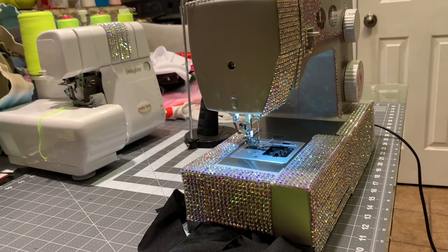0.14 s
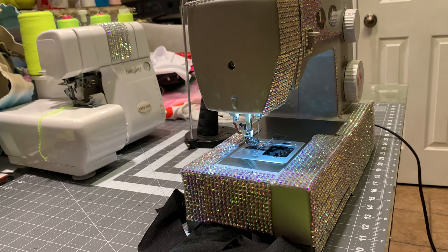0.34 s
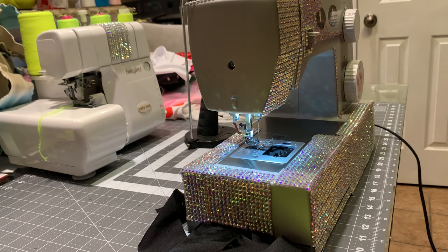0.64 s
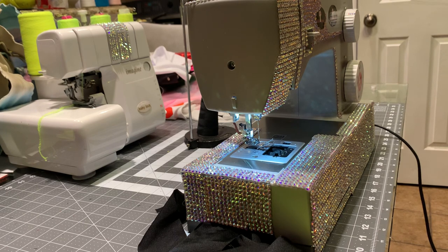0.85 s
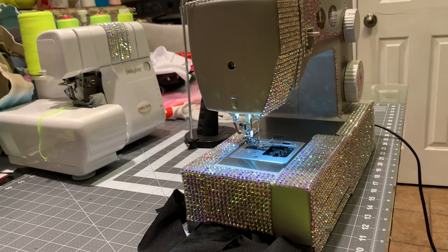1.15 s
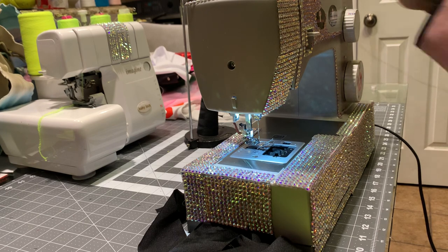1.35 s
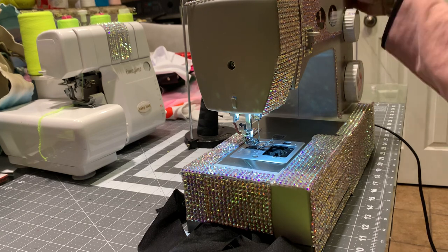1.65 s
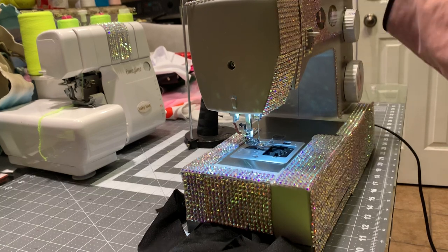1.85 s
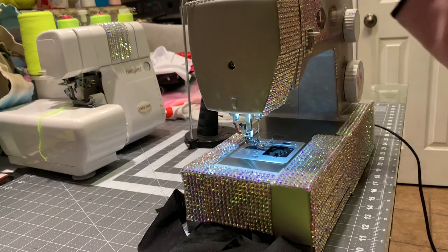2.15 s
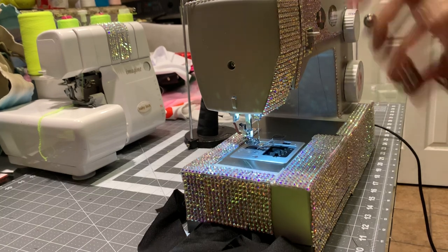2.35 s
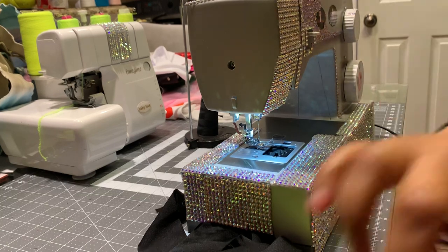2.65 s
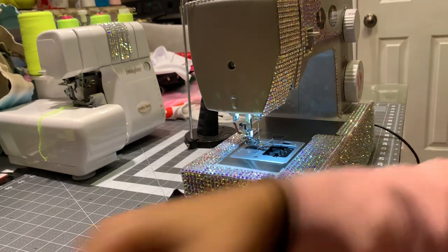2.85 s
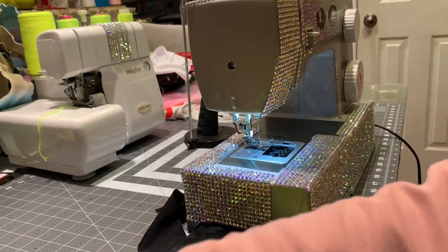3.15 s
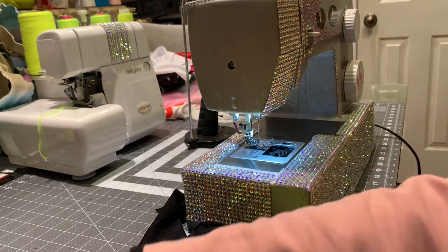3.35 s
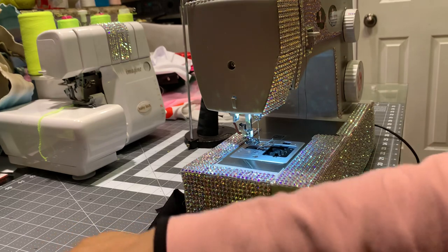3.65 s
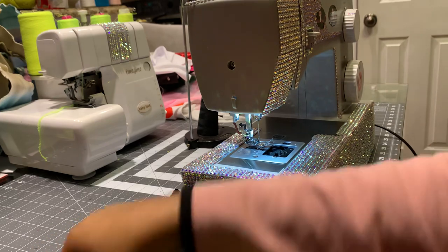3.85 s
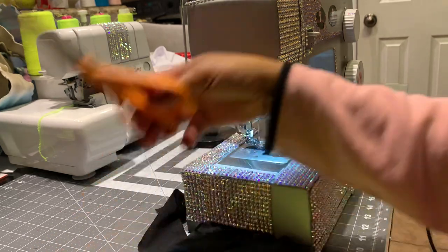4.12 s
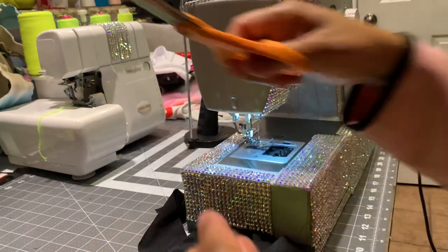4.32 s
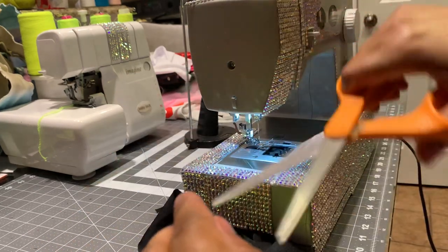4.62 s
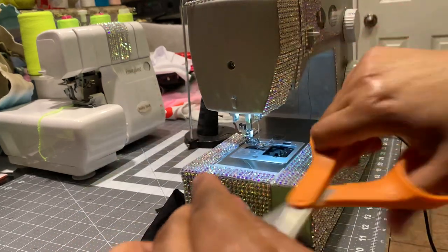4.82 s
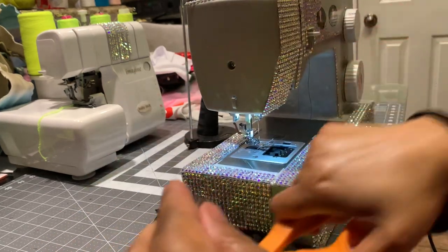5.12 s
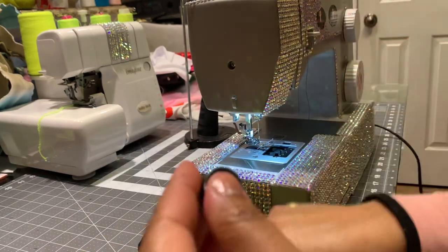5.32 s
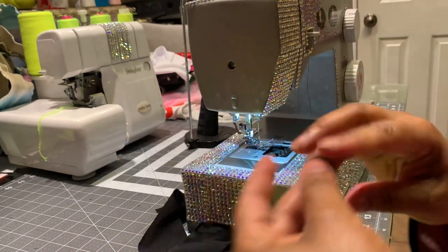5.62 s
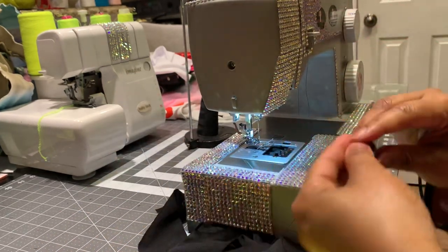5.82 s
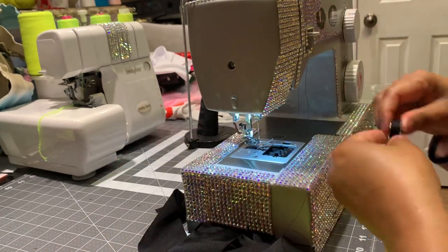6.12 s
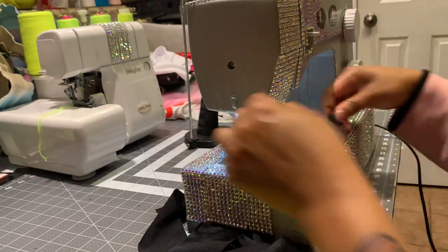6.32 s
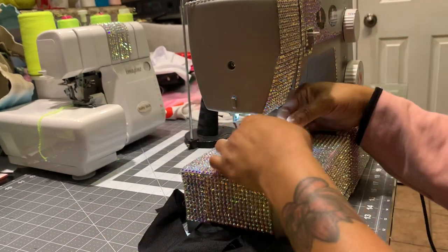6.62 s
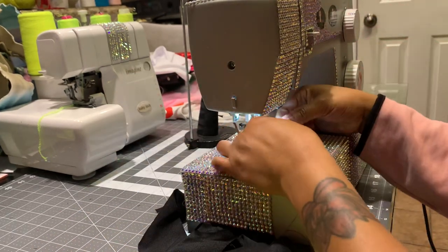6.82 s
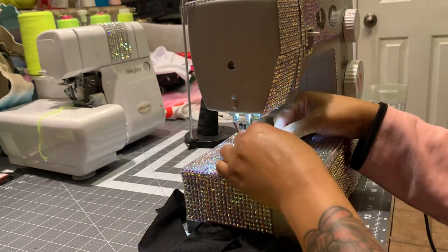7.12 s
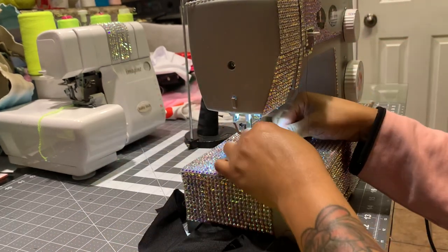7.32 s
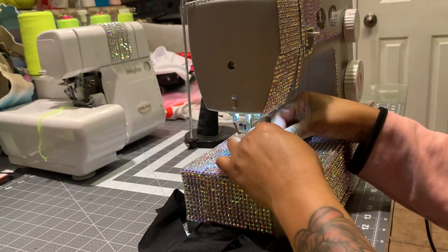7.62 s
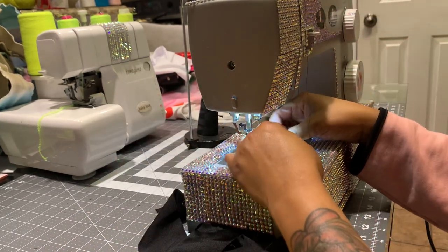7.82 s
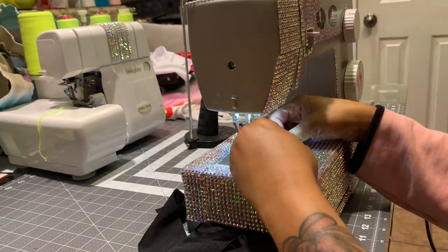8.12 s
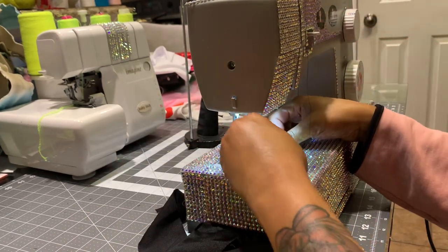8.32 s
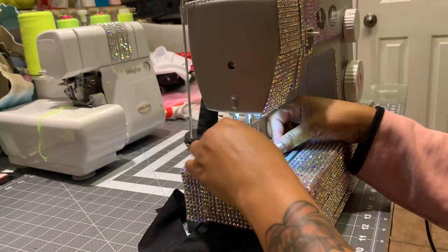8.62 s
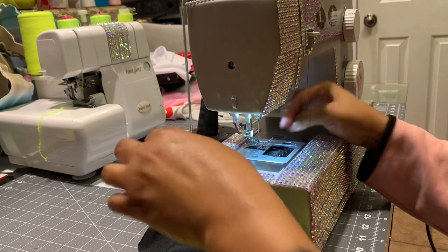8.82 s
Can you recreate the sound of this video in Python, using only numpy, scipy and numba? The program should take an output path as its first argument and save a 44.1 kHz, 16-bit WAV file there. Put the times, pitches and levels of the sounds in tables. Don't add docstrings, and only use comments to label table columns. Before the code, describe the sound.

A high electric whine drops quickly in pitch and dies, followed by one hard mechanical clack. Hands and sleeves rub softly; steel scissors knock irregularly on the desk as they are picked up, bite with a gritty metallic hiss, then land and rattle to rest. Small dull plastic clicks come in clusters and fade to quiet. Close, dry indoor sound with a short room tail and low rumble.

```python
import sys
import numpy as np
from scipy import signal
from scipy.fft import rfft, irfft, next_fast_len
from scipy.io import wavfile
from scipy.ndimage import uniform_filter1d
from numba import njit

SR = 44100
rng = np.random.default_rng(int(sys.argv[2]) if len(sys.argv) > 2 else 0)


def persist_wave(psi):
    counts = np.round(np.clip(psi, -1, 1) * 32767).astype(np.int16)
    wavfile.write(sys.argv[1], SR, np.atleast_2d(counts).T)


def voltage_ratio(decibels):
    exponent = np.asarray(decibels, float) / 20
    return 10 ** exponent


N = 395117
TIME = np.arange(N) / SR

# t/s, commutator rate f/Hz, whine level/dB
COAST = [
    (0.0, 2032, -35.5),
    (0.12, 1784, -36),
    (0.33, 1384, -43),
    (0.62, 878.5, -47),
    (0.812, 584.6, -54),
    (0.945, 396.6, -50.5),
    (1.0, 324.4, -63),
    (1.142, 201.7, -60),
    (1.32, 73.1, -60),
]
# multiple of the rate [1], level/dB
ORDERS = [(1.0, -2), (1.19, -17), (2.0, -5), (2.38, -12), (3.0, -3), (3.57, -12), (3.86, -13), (4.0, -1),
          (4.76, -13), (5.0, -7), (6.0, -11), (7.0, -13), (7.14, -14), (8.0, -15), (8.3, -16)]
# f/Hz, width [Hz], level/dB
HOUSING = [(268.3, 55, 13), (404, 36, 23.5), (630, 52, 19.5), (833, 69, 22.5), (1032, 50, 12),
           (1852, 76, 14), (2726, 67, 8), (3190, 180, 6), (3700, 140, -1), (4200, 400, 3.5),
           (4970, 180, -4.5), (5710, 900, -1), (6540, 220, -12), (9130, 2900, 0.5)]
# f/Hz, width [Hz], level/dB
BELT_COVER = [(1360, 170, 5), (2750, 300, 0)]
# f/Hz, density level/dB [per Hz]
RATTLE = [(59, -23), (100, -7.5), (1230, -8.5), (1330, -9), (1610, -12.5), (1830, -12.5), (2170, -8.5),
          (10700, -21), (11900, -39.5), (13500, -17), (16000, -74)]
# f/Hz, density level/dB [per Hz]
RUMBLE = [(25, -32.5), (45, -17), (60, -2.5), (68, 2), (80, -6), (110, -9), (160, -33.5)]


def motor():
    stop_s = COAST[-1][0]
    n = int(stop_s * SR)
    hz, whine_db = curves(COAST, n)
    speed = hz / hz[0]
    bearings_free_hz = 170
    rattle_db = -30 + 20.5 * np.log10(speed) - 20 * np.log10(1 + (bearings_free_hz / hz) ** 4)
    desk_hz, shake_db_per_octave = 656, 12.5
    shake_db = -45.5 - shake_db_per_octave * np.abs(np.log2(hz / desk_hz))

    phase = 2 * np.pi * np.cumsum(hz * (1 + 0.002 * walk(60, n))) / SR
    swell = 1 + 0.7 * np.sin(phase / 10)
    upper = 1 / (1 + (490 / hz) ** 4)
    orders = np.zeros(n)
    for k, db in ORDERS:
        edge = upper * swell if k > 2.2 else swell ** 0.3
        unsteady_db = min(1.5 + 3.5 * (k - 1), 4.0) * walk(60, n)
        jitter = (0.25 + 0.12 * k) * walk(150, n)
        orders += edge * voltage_ratio(db + unsteady_db) * np.sin(k * phase + jitter)
    belt = speed ** 2 * (np.sin(4 * phase / 5) + 0.3 * np.sin(8 * phase / 5))
    whine = resonate(orders, HOUSING) + voltage_ratio(-4) * orders + resonate(belt, BELT_COVER)
    whine = voltage_ratio(whine_db) * np.clip(hz / 240, 0, 1) ** 3 * whine

    shaft = phase / 8
    grit = noise(RATTLE, n) * (1 + 0.11 * np.sin(shaft))
    rattle = unit(grit + voltage_ratio(-5.0) * resonate(grit, HOUSING)) + 1.26 * spread(RATTLE, 0.2, n)
    dull = signal.lfilter(*signal.butter(1, 1500, fs=SR), rattle)
    rattle = voltage_ratio(rattle_db - 7.5) * (dull + (rattle - dull) * speed ** 0.11)

    shake = resonate(np.sin(shaft), [(87.5, 56, 9.4)])
    shake = shake + resonate(noise(RUMBLE, n), [(87.2, 11, 6.8)]) + 0.5 * noise(RUMBLE, n)
    running = np.clip((stop_s - TIME[:n]) / 0.06, 0, 1)
    return place(running * (whine + voltage_ratio(shake_db) * shake + rattle), lag=1, scatter_db=-28.0)


# t/s, crack level/dB, body level/dB, shell level/dB
LATCH = [
    (1.0859, -42, -42.5, -60.5),
    (1.4503, -66, -59.5, -61),
    (1.4925, -60, -52.5, -56),
    (1.6469, -5.5, -15.5, -5.5),
    (1.986, -57, -38, -40),
    (1.996, -62, -45, -38),
]
# t/s, crack level/dB, body level/dB, shell level/dB
TICKS = [
    (1.9037, -75, -55, -65),
    (1.933, -47, -64, -70),
    (1.946, -43.5, -72, -65),
    (1.978, -34.5, -70, -70),
    (1.995, -44, -70, -68),
    (2.006, -50.5, -64.5, -76),
    (2.491, -52, -78.5, -74),
    (2.593, -55.5, -77, -78),
]
# f/Hz, level/dB, t60 [s]
MACHINE = [(244, -6.5, .1), (430, -3, 0.087), (686, -12, 0.11), (743, 5, 0.16), (817, 1.5, 0.14),
           (990, -2, 0.032)]


def latch():
    snap = blows(LATCH, MACHINE, lag=13, pan=-2.4, length=0.65, rise_s=0.0064, crack_s=0.0054,
                 crack_db=1.5, body_db=5.0, shell_db=4.0, rough=0.12, shell_t60=0.12)
    ticks = blows(TICKS, MACHINE, lag=4, pan=-0.72, length=0.98, rise_s=0.00063, crack_s=0.002,
                  crack_db=9.0, body_db=-7.0, shell_db=11.5, rough=0.53, shell_t60=0.25)
    return snap + ticks


# t/s, crack level/dB, body level/dB, shell level/dB
LIFT = [(2.9877, -44, -46.5, -65), (2.9977, -41.5, -43.5, -76), (3.056, -32.5, -35.5, -41),
        (3.0688, -64.5, -34.5, -56), (3.1211, -15, -26, -21.5), (3.1488, -18, -22, -27),
        (3.218, -15.5, -35, -49), (3.2254, -18.5, -46, -43), (3.2394, -32.5, -31.5, -36),
        (3.3626, -65, -48, -53.5), (3.3837, -25, -44, -37), (3.4077, -20, -33, -57.5),
        (3.4194, -20, -49, -55), (3.472, -7, -21.5, -19.5), (3.678, -27.5, -28.5, -27.5),
        (3.7893, -23.5, -42, -42), (3.8349, -56, -68.5, -74), (3.855, -60, -68.5, -73.5),
        (3.873, -51, -76, -63), (3.9197, -62, -70.5, -68.5), (3.9634, -53, -78.5, -80.5),
        (3.9925, -45.5, -81.5, -84), (4.0135, -51, -89, -88), (4.184, -55, -45, -53),
        (4.1997, -52, -38.5, -61.5), (4.7007, -56, -81, -73), (4.8507, -47.5, -57, -66.5)]
# f/Hz, level/dB, t60 [s]
DESK = [(170.1, -4, 0.31), (277.6, -5, 0.53), (411.7, -0.5, 0.011), (480.2, 2, 0.13), (653, -3, 0.1),
        (775, 4, 0.14), (1072, 0, 0.013), (1232.6, -2, 0.036)]


def lifted_scissors():
    return blows(LIFT, DESK, lag=-13, pan=1.5, length=1.07, rise_s=0.00055, crack_s=0.00063,
                 crack_db=5.5, body_db=7.5, shell_db=6.5, rough=0.93, shell_t60=0.098)


# t/s, crack level/dB, body level/dB, shell level/dB
DROP = [
    (5.3547, -6, -28, -31.5),
]


def bounces(count):
    flight_s, rock_s, spring = 0.0534, 0.007, 0.67
    bounce_db, db_per_decade = (-12.5, -38, -40.5), (28, 21.5, 28.5)
    flight = rock_s + (flight_s - rock_s) * spring ** np.arange(count)
    db = np.array(bounce_db) + np.outer(np.log10(flight / flight_s), db_per_decade)
    return np.column_stack([DROP[0][0] + np.cumsum(flight), db]).tolist()


# f/Hz, level/dB, t60 [s]
THUMP = [(139, 4, 0.25), (201, 2.5, 0.14), (340, -4, 0.136)]


def dropped_scissors():
    return blows([*DROP, *bounces(count=11)], [*DESK, *THUMP], lag=9, pan=-0.7, length=0.8,
                 rise_s=0.002, crack_s=0.0012, crack_db=2.0, body_db=9.5, shell_db=16.5,
                 rough=0.67, shell_t60=0.055)


# t/s, crack level/dB, body level/dB, shell level/dB
SEAT = [(6.832, -52.5, -55.5, -51.5), (7.2744, -56, -59, -52), (7.3029, -50, -59, -46.5),
        (7.3311, -33.5, -50, -34.5), (7.3731, -39.5, -55, -47), (7.5389, -68.5, -69, -58),
        (7.5731, -35, -57, -38.5), (7.6038, -21.5, -44, -29.5), (7.6686, -34.5, -48, -41),
        (7.6946, -23, -45, -32), (7.8178, -62, -60.5, -49), (7.8434, -26, -48, -37),
        (7.8971, -50, -52.5, -48.5), (8.6495, -68.5, -57.5, -52), (8.9188, -54, -74.5, -84.5)]
# t/s, crack level/dB, body level/dB, shell level/dB
KNOCK = [
    (6.8064, -36.5, -58.5, -42.5),
    (7.116, -47, -53, -46.5),
    (7.9927, -59.5, -46, -52),
    (8.6074, -62, -52.5, -70),
    (8.7504, -67, -65, -61),
    (8.8049, -47, -62, -52.5),
]
# f/Hz, level/dB, t60 [s]
CASE = [(321.4, 0.5, 0.18), (415.4, 10, 0.091), (517, 9, 0.042), (596, 11, 0.075), (711, 5, 0.084),
        (779, 8.5, 0.056), (780, -18.5, 0.031)]


def bobbin_case():
    seat = blows(SEAT, CASE, lag=-1, pan=-3.6, length=1.64, rise_s=0.0088, crack_s=0.0042,
                 crack_db=-4.0, body_db=13.5, shell_db=2, rough=1.0, shell_t60=0.069)
    knock = blows(KNOCK, CASE, lag=-1, pan=-0.32, length=1.0, rise_s=0.0013, crack_s=0.002,
                  crack_db=-6.5, body_db=15.5, shell_db=2.0, rough=0.99, shell_t60=0.12)
    return seat + knock


# f/Hz, density level/dB [per Hz]
CRACK = [(1760, -35.5), (3000, -4.5), (4380, 0), (6470, -4), (7600, -3), (10200, 2), (11700, -3),
         (13600, -1), (16200, -23), (17000, -20.5)]


def blows(events, modes, lag, pan, length, rise_s, crack_s, crack_db, body_db, shell_db, rough, shell_t60):
    lead = 1024
    out, t = np.zeros((2, N + 8192)), np.arange(6144) / SR
    size = len(t)
    hz, db, t60 = np.transpose(modes)
    for s, crack, body, shell in events:
        chance, crowd = rng.standard_normal((2, len(modes))), rng.random((2, 64))
        low = ring(hz * (1 + 0.032 * chance[0]), db + 2.8 * chance[1], t60 * length, size)
        minor_hz, minor_db = 240 * 5.0 ** crowd[0, :16], -9 - 7 * crowd[1, :16]
        low = low + ring(minor_hz, minor_db, np.full(16, 0.07 * length), size)
        low = signal.lfilter(*signal.butter(2, 130, "high", fs=SR), low)
        shell_hz = 1200 * 3.7 ** crowd[0]
        high = ring(shell_hz, -7 * crowd[1], shell_t60 * length * (1500 / shell_hz) ** 0.8, size)
        buzz = signal.lfilter(*signal.butter(1, 160, fs=SR), rng.standard_normal((2, size)))
        buzz = buzz / buzz.std() * np.minimum(t / 0.0016, 1)
        low = low * (1 + rough * 0.4 * buzz[0])
        high = high * (1 + rough * buzz[1])
        tick = noise(CRACK, size) * (np.exp(-t / crack_s) + 0.05 * np.exp(-t / (0.025 * length)))
        layers = zip((tick, low, high), (crack + crack_db, body + body_db, shell + shell_db))
        tick, low, high = (np.pad(voltage_ratio(level) * x / np.abs(x).max(), (lead, 0)) for x, level in layers)
        backwards = (low + high + tick)[2 * lead - 1:lead - 1:-1]
        high[:lead] = 0.85 * backwards * np.exp(-t[lead:0:-1] / rise_s)
        bright = tick + high
        hit = low + np.array([np.roll(bright, max(lag, 0)), np.roll(bright, max(-lag, 0))])
        i = int(s * SR) - lead
        out[:, i:i + lead + size] += hit * voltage_ratio(np.array([[pan], [-pan]]) / 2)
    return place(out[:, :N], lag=0, scatter_db=-18.5)


# t/s, peak level/dB, f/Hz, left minus
# right [dB]
LONG_RINGS = [(1.647, -6.5, 757.5, 12), (1.986, -27.5, 970, 1), (3.057, -28.5, 1270, 6),
              (3.123, -34, 850, 12), (3.149, -19.5, 1033, 10), (3.218, -25, 1000, 8), (3.383, -23, 482, 1.5),
              (3.473, -24, 498, 7), (3.681, -26, 788, 8), (3.791, -35.5, 508, 3.0), (4.187, -32, 609, 2.5),
              (5.355, -20.5, 800, 14), (5.407, -30, 804, 13), (5.446, -28.5, 786, 12.5),
              (6.806, -48, 700, -4), (7.115, -39.5, 763, -0.5), (7.212, -41.5, 813, 1.5),
              (7.302, -39, 638, -8.5), (7.33, -35, 415, -6), (7.572, -42.5, 384, 4), (7.604, -34.5, 771, -5),
              (7.694, -21.5, 387, -1), (7.843, -28, 757, -4), (7.896, -36, 395, -1),
              (7.992, -30.5, 383.5, 3), (8.608, -44, 593, -1),
              (1.652, -12.5, 404, -3), (1.995, -24.5, 302, 0), (3.121, -25.5, 5500, -8),
                (3.155, -24, 730, 8), (3.24, -26, 1139, 5.5), (3.39, -24.5, 1074, 9),
                (3.475, -17.5, 1010, 9), (5.36, -28, 445, 8), (7.604, -42, 406, 0), (7.70, -47, 635, 0),
                (7.994, -47, 1123, -4), (8.608, -43.5, 1013, -0.5), (8.61, -41, 300, 0),
                (8.65, -50.5, 433, -4)]
# t/s, peak level/dB, f/Hz, left minus right [dB]
HIGH_RINGS = [(1.6472, -3, 2032, -8), (3.056, -42, 2180, 11), (3.1216, -14, 4220, 8),
              (3.1484, -16, 3720, -5), (3.22, -29, 4000, 0.0), (3.4087, -30, 4570, -3),
              (3.471, -26, 3540, 9), (3.6782, -23.5, 3650, 11), (4.7012, -49, 3000, -6),
              (5.0574, -23, 6260, -5.5), (5.3543, -27, 4460, 1), (5.4081, -28, 4550, -5),
              (5.4452, -26, 6130, -8), (6.8069, -34, 3475, -3), (7.1137, -46.5, 3880, 0),
              (7.3327, -32, 2400, -2.5), (7.3721, -34, 3530, -5), (7.5732, -30, 3700, 1.5),
              (7.6047, -29, 3850, -1.0), (7.6944, -22, 3790, -6), (7.71, -28.5, 2500, 1),
              (7.847, -28, 3680, 4), (7.847, -36.5, 1730, 0), (7.9932, -40.5, 2180, -1)]
# t/s, peak level/dB, f/Hz, left minus right [dB]
FAINT_RINGS = [(1.585, -49, 1400, 3), (1.596, -51, 2483, -4), (2.553, -53.5, 3320, 0.5),
               (2.632, -59, 3400, -1.5), (2.775, -61.5, 3800, -3), (3.835, -45, 4120, 0),
               (3.857, -45, 4120, -0.5), (3.872, -51, 4200, -0.5), (3.918, -57, 4140, 0),
               (4.013, -57.5, 3700, -2.5), (3.967, -46, 8300, 0), (3.976, -53.5, 9050, 0),
               (3.993, -41, 8400, 0), (4.013, -40, 8200, 0), (5.793, -59, 7300, 0), (5.965, -52, 1350, 0),
               (6.333, -63.5, 1604, -0.5), (6.643, -63, 1000, 3.5), (8.72, -62.5, 2000, 1),
               (8.752, -58, 2400, 0), (8.808, -57, 2440, -1)]


def struck_parts():
    low = rings(LONG_RINGS, ring_db=-4, t60=0.075)
    return low + rings([*HIGH_RINGS, *FAINT_RINGS], ring_db=0, t60=0.016)


def rings(events, ring_db, t60):
    n = 8192
    out = np.zeros((2, N + n))
    for s, db, hz, pan_db in events:
        short = t60 * min(1, 1500 / hz + 0.4)
        partners_hz, partners_db = hz * np.array([1, 1.045, 0.93]), np.array([0.0, -6.0, -9.0])
        x = ring(partners_hz, partners_db, short * np.array([1, 0.7, 0.6]), n)
        x = x * voltage_ratio(3.5 * walk(hz / 8, n)) * np.minimum(TIME[:n] * hz / 5.1, 1)
        sides_db = np.clip(pan_db, -8, 8) * np.array([[0.5], [-0.5]])
        i = int(s * SR)
        out[:, i:i + n] += x * voltage_ratio(db + ring_db + sides_db)
    return out[:, :N]


# start t/s, attack [s], hold [s], release [s], level/dB
SNIPS = [
    (4.424, .014, 0.026, 0.061, -37.5),
    (4.825, 0.046, .02, 0.015, -40),
    (4.872, 0.019, 0.014, 0.0057, -27),
    (5.043, 0.011, 0.0036, 0.039, -35.5),
    (5.05, .016, 0.026, 0.01, -36),
    (5.19, .03, 0.0062, 0.044, -64.5),
]
# f/Hz, density level/dB [per Hz]
BLADES = [(300, -16.5), (1000, -23), (1900, -17), (3300, -17.5), (10600, -12), (11700, -3), (13500, -12),
          (15900, -32), (17000, -72.5)]
BLADE_BANDS_HZ = [2000, 3200, 4300, 5600, 7000, 8600, 10300, 13000, 15000]


def scissors():
    first, n = int(SNIPS[0][0] * SR), SR
    gritty = noise(BLADES, n) * voltage_ratio(2.2 * walk(700, n))
    grit = np.zeros(N)
    grit[first:first + n] = patchy(gritty, BLADE_BANDS_HZ, rate=110, patchy_db=4.5)
    return place(grit * stroke(SNIPS), lag=1, scatter_db=-23)


# start t/s, attack [s], hold [s], release [s], level/dB
SHEEN = [
    (3.27, 0.063, 0.067, .03, -50.5),
    (3.49, .01, 0.048, 0.46, -53),
    (3.69, 0.015, 0.058, 0.028, -68),
    (3.8, 0.013, 0.038, 0.23, -68),
]
# f/Hz, density level/dB [per Hz]
STEEL = [(3000, -29), (6000, -8), (8500, -1.5), (10800, -6.5), (11700, -27.5), (13500, -10), (14500, -39.5)]


def sheen():
    return stroke(SHEEN) * patchy(spread(STEEL, 0.42), BLADE_BANDS_HZ, rate=30, patchy_db=-3.5)


# start t/s, attack [s], hold [s], release [s], level/dB
SLIDES = [(1.622, .023, .001, .006, -25), (1.66, .005, .03, .55, -40), (1.975, .013, .014, .065, -41),
          (3.14, .011, .098, .11, -39.5), (3.31, .092, .0021, .01, -36), (3.48, .01, .03, .34, -44),
          (4.17, .025, .03, .2, -50), (4.83, .04, .05, .15, -59), (5.04, .04, .03, .12, -59),
          (6.0, .36, .25, .3, -68), (7.29, .016, .085, .083, -56.5), (7.8, .032, .091, .081, -65),
          (7.995, .0052, .45, .4, -65), (8.602, .0063, .028, .12, -63)]
# f/Hz, density level/dB [per Hz]
SCRAPE = [(180, -42.5), (300, -13.5), (962, -0.5), (2890, -14), (3300, -16), (7690, -19.5), (9570, -24),
          (13400, -35.5), (17000, -59)]
# start t/s, length [s], f/Hz, glide [Hz per
# s], level/dB
SQUEAKS = [(1.955, 0.032, 3700, 127000, -39), (3.335, 0.0602, 1850, 8.3, -44),
           (3.33, 0.052, 2416, 10, -54.5), (3.499, 0.08, 1850, 8.2, -42), (3.352, 0.063, 184, 9.2, -35.5),
           (4.19, 0.12, 140.8, 12.5, -54), (5.57, 0.1, 170, 0.97, -56), (5.74, 0.21, 2500, 12.5, -77.5),
           (2.2, 0.13, 2450, 10, -71.5), (2.21, 0.072, 4200, 9.7, -77), (6.22, 0.4, 3650, 11.3, -81),
           (7.948, 0.36, 3700, 9.6, -78), (8.61, 0.15, 170, 1, -52.5)]
CLOTH_BANDS_HZ = [800, 1400, 2500, 3700, 6000, 10000]


def slides():
    out = stroke(SLIDES) * patchy(noise(SCRAPE), [450, *CLOTH_BANDS_HZ], rate=28, patchy_db=5.5)
    wobble, flutter = walk(400), walk(220)
    for s, length, hz, glide, db in SQUEAKS:
        now = slice(int(s * SR), int((s + length) * SR))
        t = TIME[now] - s
        phase = 2 * np.pi * np.cumsum((hz + glide * t) * (1 + 0.055 * wobble[now])) / SR
        swell = np.abs(np.sin(np.pi * t / length)) ** 0.56
        out[now] += np.sin(phase) * voltage_ratio(db + 4.2 * flutter[now]) * swell
    return place(out, lag=2, scatter_db=-19.0)


# t/s, drag level/dB, arm weight level/dB
HANDS = [(1.2, -70, -53), (1.62, -63.5, -81.5), (1.72, -50.5, -57.5), (2.32, -62.5, -66.5),
         (2.71, -73, -65.5), (3.03, -61.5, -49.5), (3.19, -50, -52), (3.6, -45, -57.5), (3.95, -75, -60.5),
         (4.25, -70.5, -62.5), (5.3, -70.5, -65.5), (5.42, -71, -48.5), (6.13, -76, -70.5),
         (6.52, -61, -66.5), (7.12, -78, -56), (7.62, -62, -55.5), (8.79, -65.5, -59.5), (8.96, -65, -68)]
# f/Hz, density level/dB [per Hz]
RUB = [(59, -35), (100, 2), (184, 0), (226, -3), (332, -3), (795, -14.5), (1160, -28), (1500, -21),
       (1950, -52), (3300, -120)]
# f/Hz, density level/dB [per Hz]
RUSTLE = [(470, -28), (800, 4.5), (1390, -14.5), (1720, -2), (3350, -14.5), (4440, -22.5), (10600, -19),
          (11900, -37.5), (13700, -27.5), (17000, -79)]


def hands(struck):
    drag_db, weight_db = curves(HANDS)
    settle_s, settle_db = 0.0086, (-22, -16, -26.5)
    keep = np.exp(-1 / (settle_s * SR))
    stir = np.sqrt(signal.lfilter([1 - keep], [1, -keep], struck.mean(0) ** 2))
    after = voltage_ratio(np.array(settle_db))[:, None] * stir
    present = np.clip((TIME - HANDS[0][0]) / 0.051, 0, 1)
    rub = (voltage_ratio(drag_db) + after[0]) * voltage_ratio(2.5 * walk(25)) * spread(RUB, 0.6)
    cloth = patchy(spread(RUSTLE, 0.099), CLOTH_BANDS_HZ, rate=12, patchy_db=2.5)
    flutter_db = 1.5 * walk(20) + 0.7 * walk(300)
    rustle = (voltage_ratio(-74.5 + 1.2 * (drag_db + 64.5)) + after[1]) * voltage_ratio(flutter_db) * cloth
    rumble = (voltage_ratio(weight_db) + after[2]) * voltage_ratio(walk(5.4)) * spread(RUMBLE, 0.96)
    return present * (rub + rustle) + rumble


def room(x):
    t60_s, treble_t60_s, treble_db = 0.36, 0.3, -11.5
    t = TIME[:SR // 2]
    tail = rng.standard_normal((2, len(t))) * np.clip((t - 0.004) / 0.0046, 0, 1)
    bass = signal.lfilter(*signal.butter(1, 2500, fs=SR), tail)
    tail = bass * voltage_ratio(-60 * t / t60_s) + (tail - bass) * voltage_ratio(treble_db - 60 * t / treble_t60_s)
    tail = signal.lfilter(*signal.butter(4, 14200, fs=SR), tail)
    tail = tail / np.sqrt(np.sum(tail ** 2) / 2)
    return voltage_ratio(-14.5) * signal.fftconvolve(x.mean(0)[None], tail, axes=1)[:, :N]


# f/Hz, density level/dB [per Hz]
AIR = [(12, -45.5), (20, -2.5), (78, -6.5), (247, -17), (356, -24.5), (681, -15.5), (983, -28),
       (10200, -36.5), (11800, -47.5), (13600, -27), (17000, -68)]


def still_air():
    return voltage_ratio(-70.5) * spread(AIR, 0.062)


def unit(x):
    return x / np.sqrt(np.mean(x ** 2))


def curves(table, size=N):
    s, *columns = np.transpose(table)
    return [np.interp(TIME[:size], s, c) for c in columns]


def noise(spectrum, size=N):
    hz, db = np.transpose(spectrum)
    fast = next_fast_len(size)
    f = np.fft.rfftfreq(fast, 1 / SR) + 1
    gain = voltage_ratio(np.interp(np.log(f), np.log(hz), db, left=-90, right=-90))
    return unit(irfft(rfft(rng.standard_normal(fast)) * gain, fast)[:size])


def spread(spectrum, alike, size=N):
    mid, side = noise(spectrum, size), noise(spectrum, size)
    return (np.sqrt(1 + alike) * mid + np.sqrt(1 - alike) * side * np.array([[1], [-1]])) / np.sqrt(2)


def walk(rate, size=N):
    k = int(SR / rate)
    held = np.repeat(rng.standard_normal(size // k + 1), k)
    return 1.3 * uniform_filter1d(uniform_filter1d(held, k), k)[:size]


def patchy(x, bands_hz, rate, patchy_db):
    total = 0
    for hz in bands_hz:
        band = signal.lfilter(*signal.iirpeak(hz, 2, fs=SR), x)
        total = total + voltage_ratio(patchy_db * walk(rate, x.shape[-1])) * band
    return unit(total)


def stroke(rows, size=N):
    total = np.zeros(size)
    for s, up, hold, down, db in rows:
        corners = np.cumsum([s, up, hold, down])
        total += voltage_ratio(db + np.interp(TIME[:size], corners, [-35, 0, 0, -35], left=-200, right=-200))
    return total


def resonate(x, peaks):
    total = 0
    for k, (hz, width, db) in enumerate(peaks):
        total = total + (-1) ** k * voltage_ratio(db) * signal.lfilter(*signal.iirpeak(hz, hz / width, fs=SR), x)
    return total


@njit
def ring(hz, db, t60, size):
    out = np.zeros(size)
    for k in range(len(hz)):
        z = (-1) ** k * 10 ** (db[k] / 20) + 0j
        p = np.exp(2j * np.pi * hz[k] / SR - np.log(1000) / (t60[k] * SR))
        for i in range(min(size, int(1.5 * t60[k] * SR))):
            out[i] += z.imag
            z *= p
    return out


def place(x, lag, scatter_db):
    n = np.arange(256)
    echo = rng.standard_normal((2, 256)) * voltage_ratio(scatter_db) * np.exp(-n / 70) * (n > abs(lag))
    echo[0, max(lag, 0)] = echo[1, max(-lag, 0)] = 1
    echo = echo / np.sqrt(np.sum(echo ** 2, axis=1, keepdims=True))
    x, out = x * np.ones((2, 1)), np.zeros((2, N + 255))
    first, last = np.flatnonzero(x[0])[[0, -1]]
    out[:, first:last + 255] = signal.fftconvolve(x[:, first:last], echo, axes=1)
    return out[:, :N]


def scene():
    struck = latch() + lifted_scissors() + dropped_scissors() + bobbin_case() + struck_parts()
    near = motor() + struck + scissors() + sheen() + slides()
    near = signal.sosfilt(signal.butter(3, 55, "high", fs=SR, output="sos"), near)
    return near + room(near) + hands(struck) + still_air()


def top_cut(x):
    return signal.sosfilt(signal.butter(12, 17160, fs=SR, output="sos"), x)


def record(dry):
    dip = signal.sosfilt(signal.butter(2, [11100, 12450], "bandstop", fs=SR, output="sos"), dry)
    dip = signal.sosfilt(signal.butter(6, 15800, fs=SR, output="sos"), dip)
    rounded = 0.9 * np.tanh((0.92 * dip + 0.08 * dry) / 0.9)
    return top_cut(rounded)


dry = scene()
out = record(dry)
persist_wave(out)
```